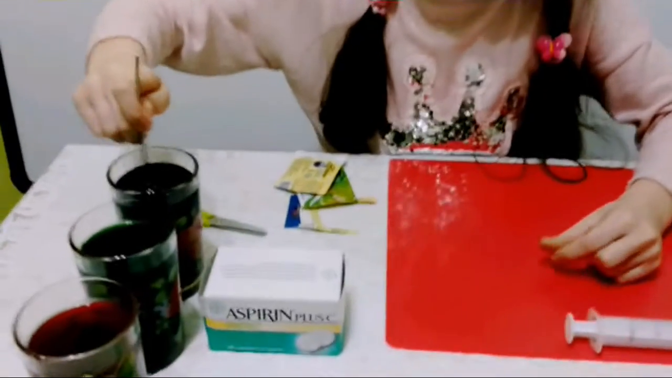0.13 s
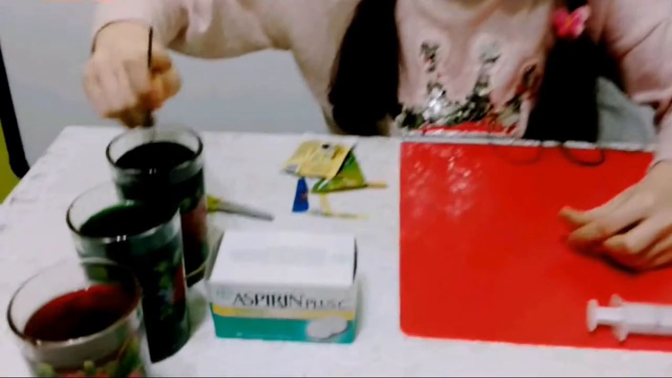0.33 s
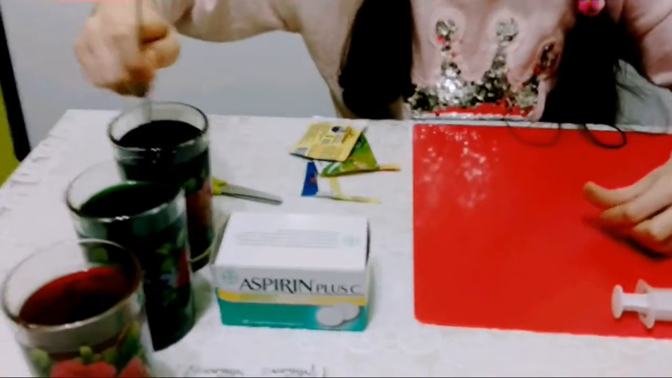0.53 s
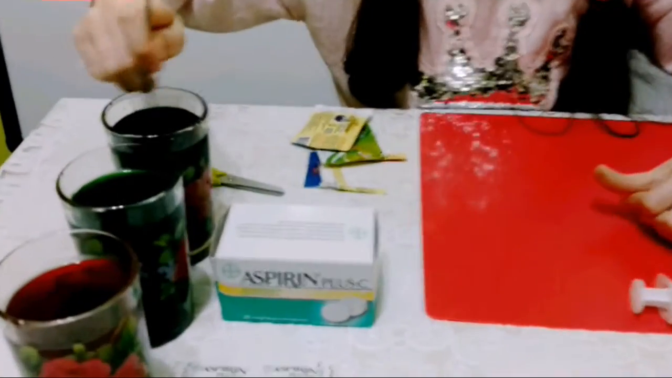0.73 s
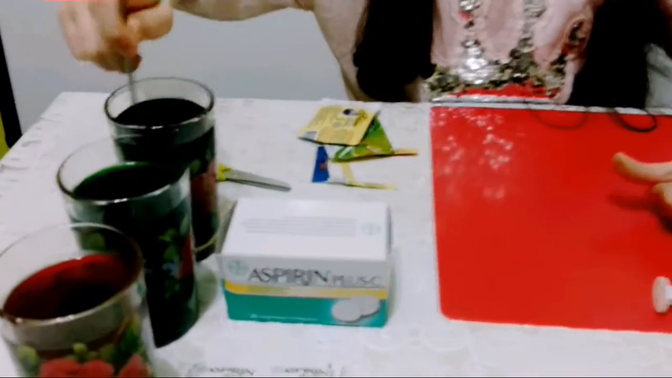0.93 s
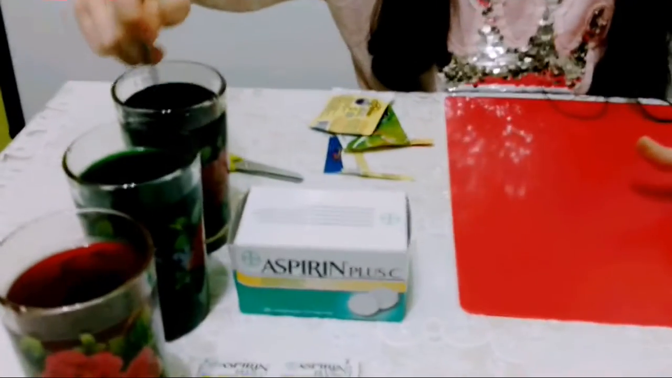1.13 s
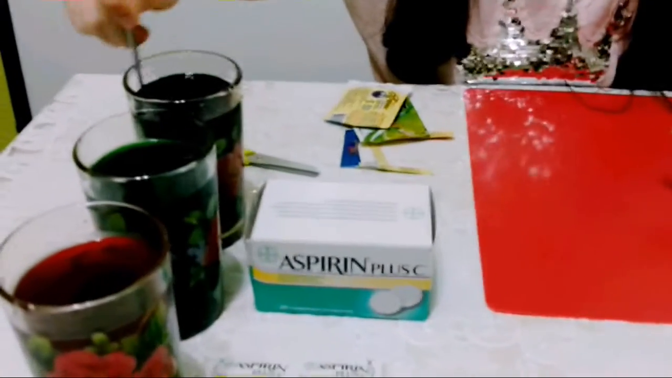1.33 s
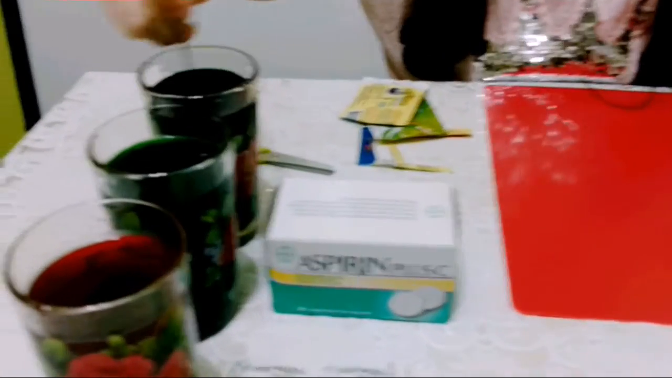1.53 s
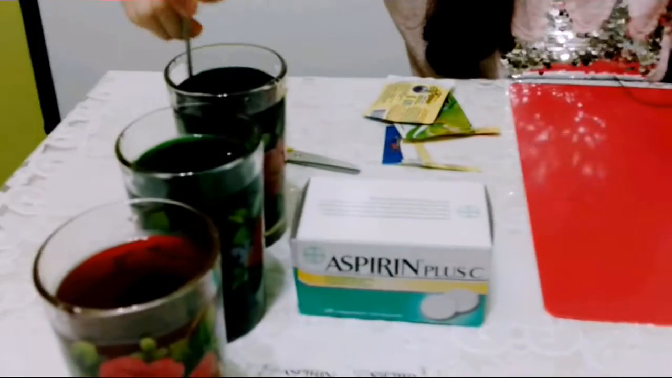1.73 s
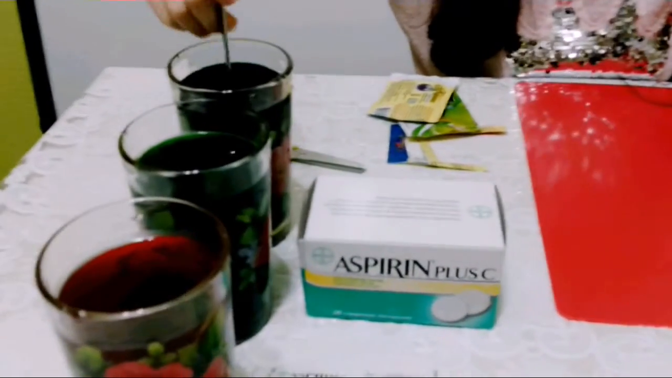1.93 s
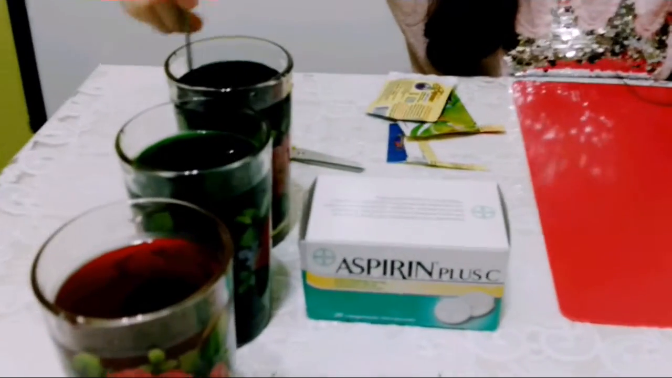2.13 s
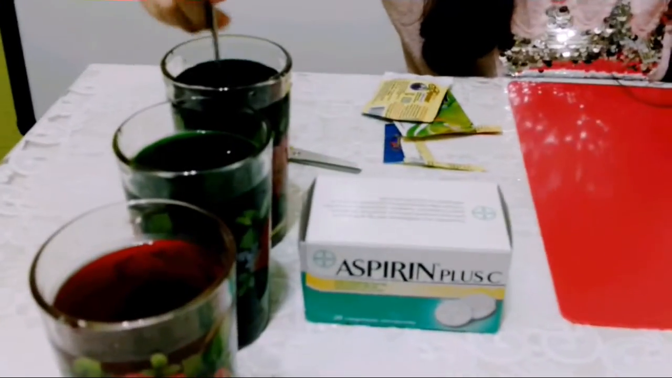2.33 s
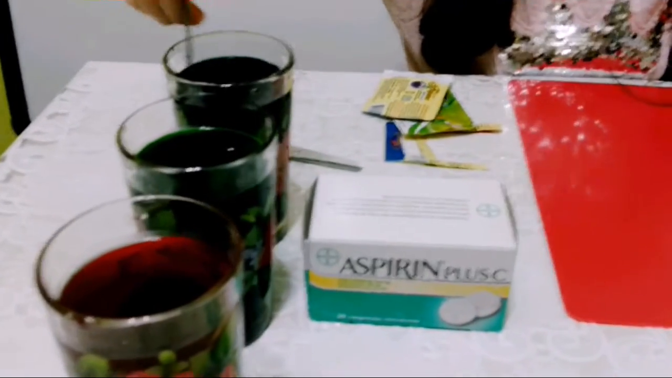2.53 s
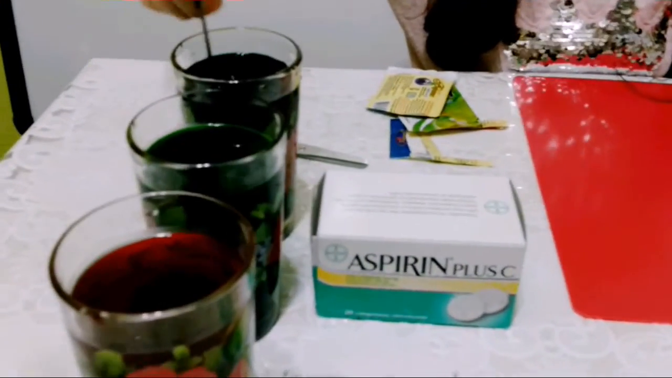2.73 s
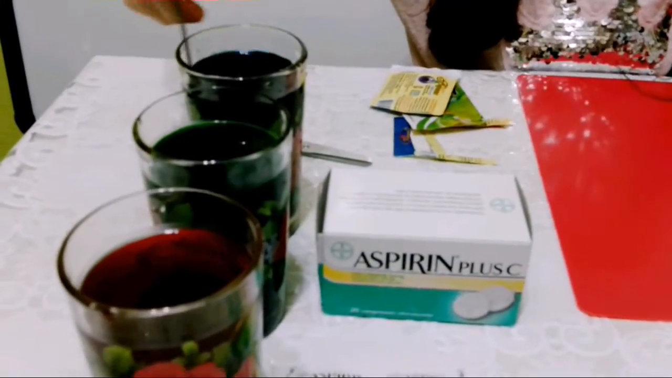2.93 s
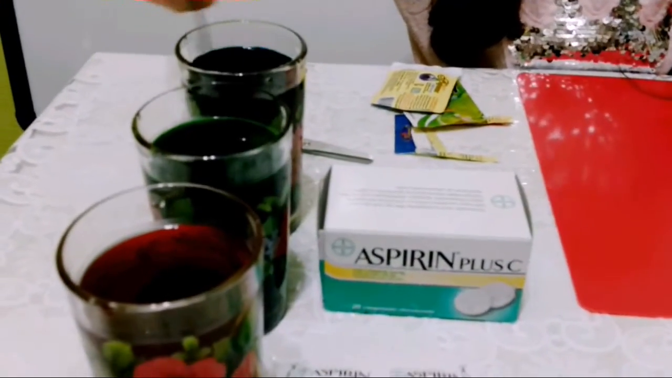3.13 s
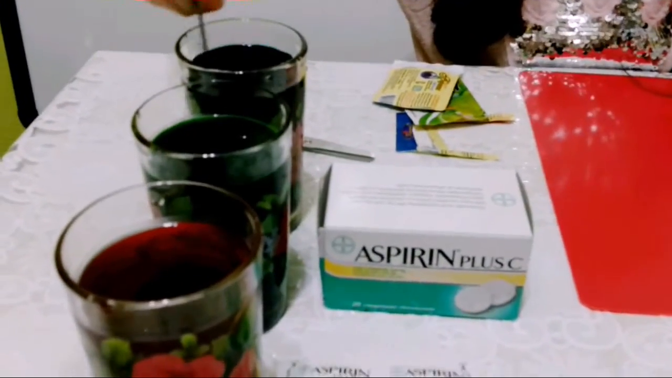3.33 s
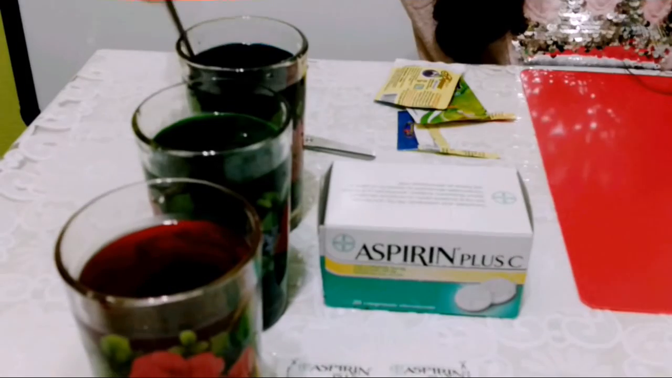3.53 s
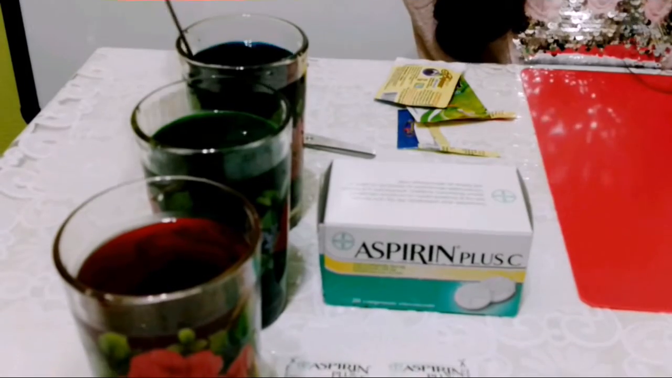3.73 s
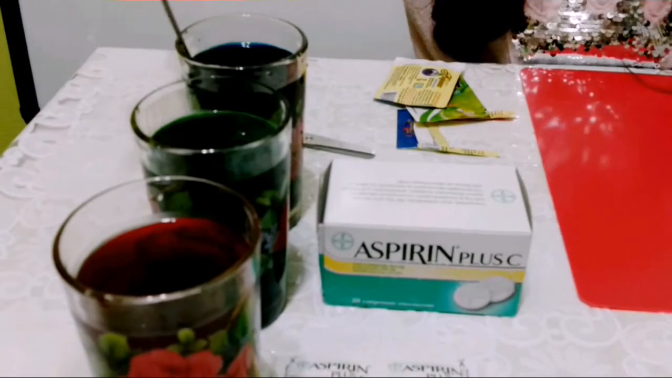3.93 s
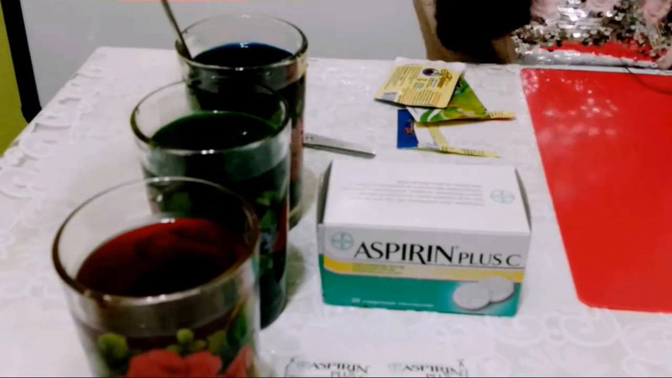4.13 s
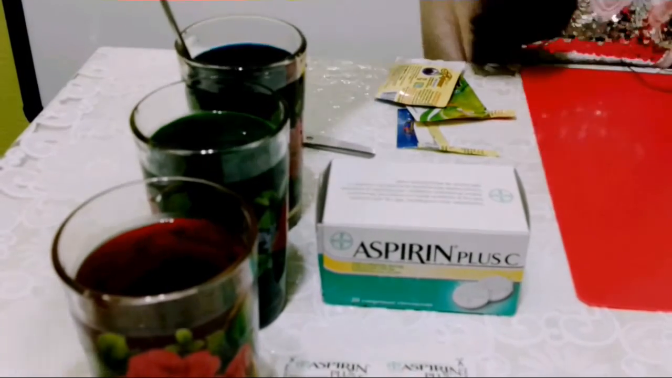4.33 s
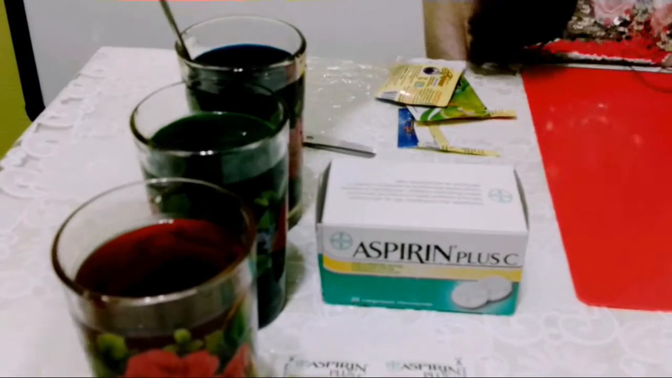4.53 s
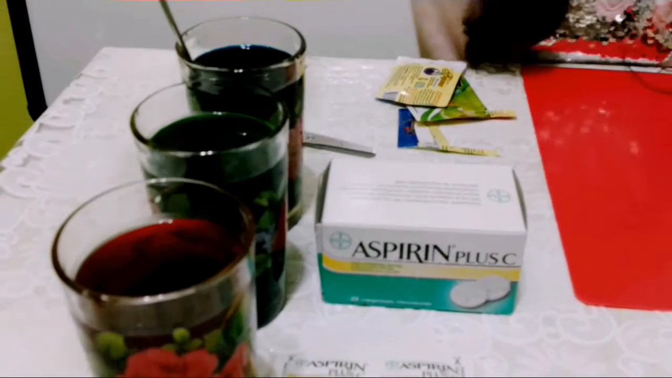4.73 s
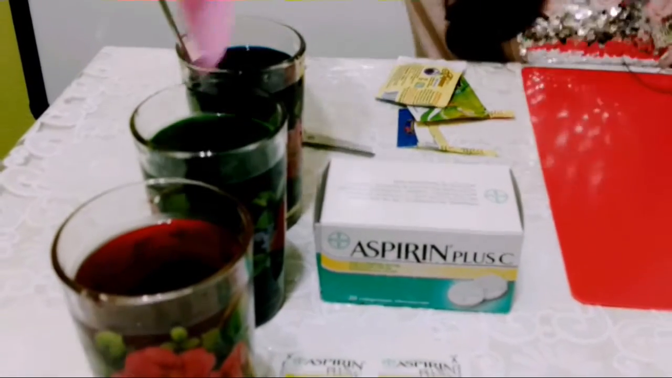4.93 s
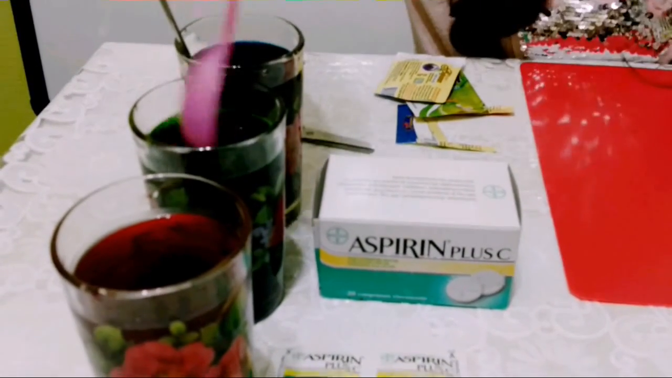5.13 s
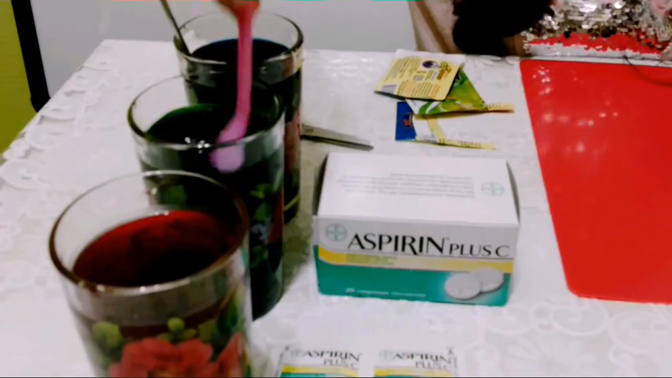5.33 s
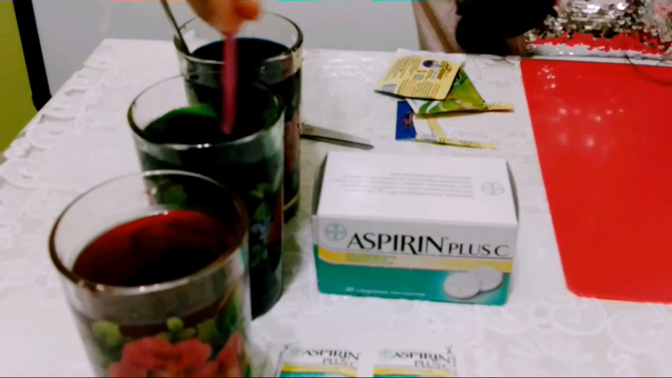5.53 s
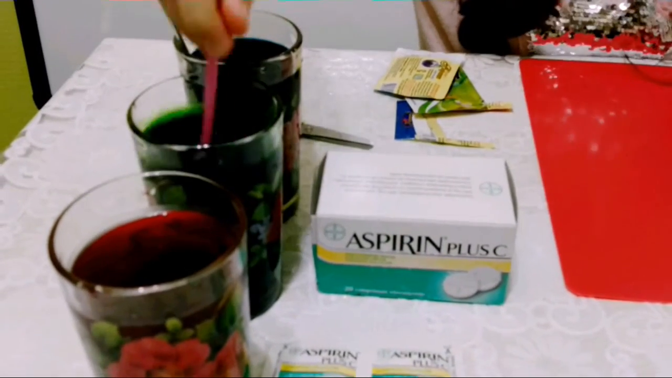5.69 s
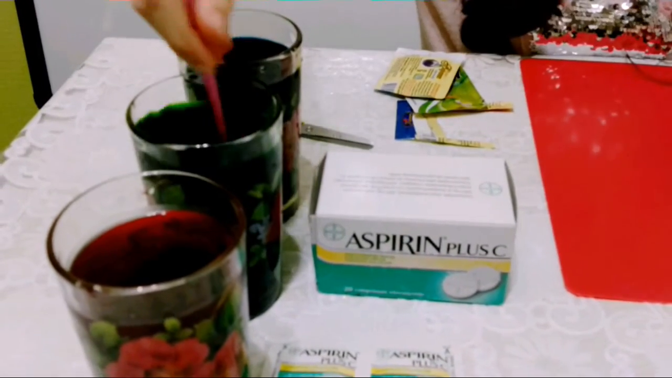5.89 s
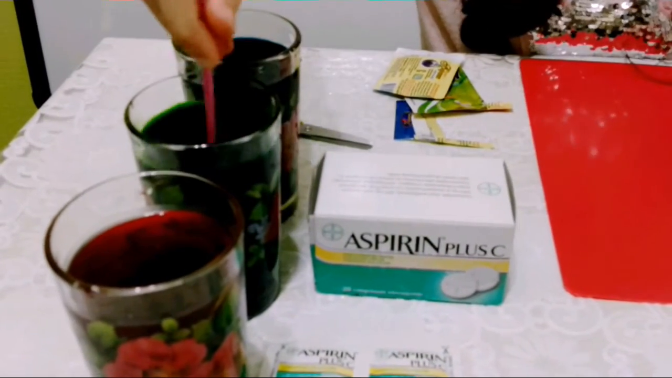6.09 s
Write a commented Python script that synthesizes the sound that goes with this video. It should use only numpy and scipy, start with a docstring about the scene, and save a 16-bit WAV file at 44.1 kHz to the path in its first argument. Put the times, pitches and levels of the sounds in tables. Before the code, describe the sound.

Bright, short glass ticks come in an irregular stirring rhythm, mixed with tiny drags and wet plops from a full glass on a cloth-covered table. They end in a hard clink, a low thump and a few settling ticks. Sleeve fabric rustles briefly in the near silence, then a few duller plastic knocks and soft scrapes follow in a second glass. Close stereo microphones, short room tail, faint hiss and electronic whine.

```python
"""Two spoons, two glasses

On a cloth-covered table in a small room a metal spoon stirs a full drinking glass: modes of glass
and spoon ring at each clink, runs of tiny slips make the drags, gliding bubbles make the slops.
After a pause with a rustle of clothing a plastic spoon knocks softly in the next glass.
Two close microphones add rumble, hiss and a thin electronic whine of two steady sines.
"""
import sys
import numpy as np
from scipy import signal
from scipy.fft import rfft, irfft, next_fast_len
from scipy.io import wavfile
from scipy.ndimage import map_coordinates

SR = 44100
rng = np.random.default_rng(int(sys.argv[2]) if len(sys.argv) > 2 else 0)


def digitize_waveform(pressure):
    """Quantize a signal to 16-bit integers and store it at the path in sys.argv[1].

    Rows of a 2-D input are taken as channels; values are limited to [-1, 1].
    """
    field = np.atleast_2d(pressure).T
    bounded = np.clip(field, -1, 1)
    quanta = np.round(bounded * 32767).astype(np.int16)
    wavfile.write(sys.argv[1], SR, quanta)


N = 276012
TIME = np.arange(N) / SR
HIT = np.arange(SR * 3 // 4) / SR  # time axis of one hit, s

# Modes of the glass on the table with the metal spoon in it.
# Each row: nominal pitch in Hz, relative level in dB, t60 in seconds.
GLASS_MODES = [(135.4, -25.5, 0.45), (303, -11.5, 0.13), (479.4, -3, 0.077), (716, -4.5, 0.08),
               (2307, 10, 0.02), (2417, 12.5, 0.0234), (2925, 9, 0.024), (3390, -17, 0.065),
               (4023, -8, 0.048), (5260, -8, 0.089), (5790, 3, 0.012), (6250, -11, 0.0768),
               (6750, -5, 0.081), (6900, -19.5, 0.13), (8230, -33, 0.076), (7900, -5, 0.087),
               (8640, -27, 0.038), (8700, -13, 0.038), (9870, 0.5, 0.05), (10500, -12, 0.047),
               (10260, 9, 0.024), (10790, -19, 0.26), (13300, -12, 0.046), (14100, -7, 0.06)]
# Colour of the metal spoon's crack. Each row: frequency in Hz, relative level in dB.
METAL_COLOUR = [(100, -40), (300, -11), (750, -15), (1100, -1.5), (1450, -6.5), (1850, -3.5), (2300, 13.5),
                (2750, 6.5), (3150, 0.5), (3500, -12.5), (3950, -21), (4700, -46.5), (5500, -18),
                (8200, -3), (10700, -13.5), (11500, -2), (14000, -22)]
# Colour of plastic rasping on glass. Each row: frequency in Hz, relative level in dB.
RASP_COLOUR = [(300, -23), (1000, 5), (1600, -10), (2300, 10), (2900, -1), (3600, -0.5), (4700, -7.5),
               (6000, -1.5), (9500, -7.5), (14000, -19)]

STIR_CHANGE_S = 4.2  # sliding and swirl are the metal spoon's before this, the plastic spoon's after
RIM_HZ = 2068  # nominal pitch of the rim
SCRAPE_SPREAD_DB = 5  # how unequal the slips of a scrape are
PLOP_GLIDE = .07  # share by which a bubble's pitch glides, before any chance factor


def undb(db):
    """Decibels to gain."""
    return 10 ** (np.asarray(db) / 20)


def unit(x):
    """Scale to rms 1."""
    return x / np.sqrt(np.mean(x ** 2))


def fade(t60):
    """Exponential decay over the length of one hit, down 60 dB after t60 seconds."""
    return np.exp(-np.log(1000) * HIT / t60)


def add(track, s, sound):
    """Mix a sound into a track at a time in seconds."""
    i = max(int(s * SR), 0)
    track[i:i + len(sound)] += sound[:max(N - i, 0)]


def colour(x, points):
    """Causal minimum-phase filter through (Hz, dB) points."""
    n = 2 * next_fast_len(len(x))
    hz, db = np.transpose(points)
    f = np.maximum(np.arange(n // 2 + 1) * SR / n, 1)
    cepstrum = irfft(np.log(undb(np.interp(np.log(f), np.log(hz), db))))
    # folding the cepstrum forward makes the response causal
    cepstrum[1:n // 2] *= 2
    cepstrum[n // 2 + 1:] = 0
    return irfft(rfft(x, n) * np.exp(rfft(cepstrum)))[:len(x)]


def unevenness(rate, count=N):
    """Smooth random wandering around zero, with rate (Hz) new targets a second."""
    knots = rng.standard_normal(int(count / SR * rate) + 2)
    return np.interp(TIME[:count] * rate, np.arange(len(knots)), knots)


def waver(x, share, rate):
    """Moving water and a moving contact point bend every pitch by a wandering share."""
    speed = 1 + share * unevenness(rate, count=len(x))
    return map_coordinates(x, [np.cumsum(speed)], mode="mirror")


def flutter(x, depth_db, rate):
    """The level of a ring trembles as water and spoon brush the wall."""
    return x * undb(depth_db * unevenness(rate, count=len(x)))


def grit(count, spread_db):
    """Tiny slips of uneven size, on about a tenth of the samples."""
    slips = rng.standard_normal(count) * (rng.random(count) < .1)
    return unit(slips * undb(spread_db * np.minimum(rng.exponential(size=count), 4)))


def crack(points, t60, chatter_s):
    """Coloured noise as the dense vibration of a contact: it chatters for a moment, then is damped."""
    decay = np.minimum(np.exp(-np.log(1000) * (HIT - chatter_s) / t60), 1)
    onset = 1 - np.exp(-HIT / 0.00027)
    return unit(colour(rng.standard_normal(len(HIT)), points)) * decay * onset


def ring(modes, scatter_db, detune):
    """Decaying modes; the touching spoon changes their shares and bends their pitch a little."""
    total = np.zeros(len(HIT))
    for hz, db, t60 in modes:
        share, bend, side = rng.uniform(-1, 1, 3)
        gain = np.sign(side) * undb(db + scatter_db * share)
        total += gain * fade(t60) * np.sin(2 * np.pi * hz * (1 + detune * bend) * HIT)
    return total


def contact(x, levels, length):
    """Set four band levels: a hard edge brings out the treble, a flat blow the wall, a low one the base."""
    # bright tick, upper wall ring, lower wall ring, knock through the base (Hz)
    bands = [(4500, 16000), (2750, 4500), (1100, 2750), (100, 1100)]
    total = np.zeros(len(x))
    for band, db in zip(bands, levels):
        part = signal.sosfilt(signal.butter(6, band, "band", fs=SR, output="sos"), x)
        total += undb(db) * part / np.std(part[:int(length * SR)])
    return total


def background():
    """Low room rumble, partly alike at both microphones, their hiss and two steady electronic tones."""
    # Colour of the quiet room. Each row: frequency in Hz, relative level in dB.
    quiet_colour = [(15, -42), (25, 7.5), (95, -12), (131, -2.5), (158, -21), (191, -8), (264, -24),
                    (301, -12.5), (588, -24), (749, -40), (833, -46), (4500, -29), (6040, -29.5),
                    (12100, -19.5), (15000, -46.5)]
    # Right microphone's noise against the left. Each row: frequency in Hz, difference in dB.
    right_hiss = [(200, 0), (2400, 3), (4500, 0.5), (8300, 3), (11000, 0.5), (14000, 11.5)]
    # Whine, a row for each of its two tones: left rms level in dB, right rms level in dB.
    whine_levels = [(-68.5, -91.5), (-106, -60)]
    shared = colour(rng.standard_normal(N), [(40, -4), (250, 3.0), (1000, -27.0), (3000, -24.0)])
    left, right = (unit(colour(own + shared, quiet_colour)) for own in rng.standard_normal((2, N)))
    noise = undb(-68) * np.array([left, colour(right, right_hiss)])
    whine = np.zeros((2, N))
    for hz, db in zip((9538.5, 11867), whine_levels):
        whine += np.sqrt(2) * np.outer(undb(db), np.sin(2 * np.pi * hz * TIME))
    return noise + whine


def sleeve():
    """Brief rustles of clothing: coloured grains that swell and die away."""
    # Each row: start in seconds, length in seconds, rms level in dB,
    # treble tilt in dB (everything below 2.5 kHz lies about twice this far under 9 kHz).
    rustles = [(4.457, 0.17, -80.5, -12), (4.689, 0.069, -57.5, 17), (4.924, 0.066, -73, -5)]
    out = np.zeros(N)
    for s, length, db, tilt_db in rustles:
        n = int(max(length, .02) * SR)
        low_db = -2 * tilt_db
        cloth = [(200, low_db), (2500, low_db), (9000, 0.012), (14000, -9.5)]  # cloth dulls the top
        rustle = colour(grit(n, spread_db=3.0), cloth)
        add(out, s, undb(db) * unit(rustle * np.hanning(n)))
    return out


def bubble(hz, cycles, glide):
    """A trapped air pocket rings, gliding in pitch by a share of it, and dies within some cycles."""
    t = HIT[:int(SR * cycles / hz)]
    age = t * hz / cycles
    tone = np.sin(2 * np.pi * hz * t * (1 + glide * age / 2))
    return tone * np.exp(-np.log(1000) * age) * (1 - np.exp(-t * hz))


def chance_plops(slosh_db):
    """Unevenly spaced further plops that follow the swirl, as rows of seconds, dB and Hz."""
    gap_s, over_slosh_db, middle_hz, spread_oct = .07, 11, 504, 0.513
    starts = np.arange(0, N / SR, gap_s)
    late, size, pitch = rng.uniform(-1.1, 1, (len(starts), 3)).T
    times = starts + gap_s * (1 + late) / 2
    peak_db = np.interp(times, TIME, slosh_db) + over_slosh_db + 4 * size
    return list(zip(times, peak_db, middle_hz * 2 ** (spread_oct * pitch)))


def water(db):
    """Short plops, each with a small wet slap, over a swirl of little bubbles and fizz."""
    # Separately heard plops, strong and faint, as water folds over the spoon.
    # Each row: start in seconds, bubble level in dB, bubble's starting pitch in Hz.
    placed_plops = [(0.377, -54, 487), (0.607, -60, 470), (.71, -52.5, 435), (0.797, -50, 331.6),
                    (.915, -50, 450), (.971, -52.5, 637), (1.18, -46, 717), (1.286, -48.5, 665),
                    (1.38, -47.5, 472), (1.452, -53, 340), (1.497, -51.5, 806), (1.505, -52, 383),
                    (1.555, -56, 635), (1.6, -53.5, 466), (1.665, -59, 730), (1.725, -49, 463),
                    (1.865, -57, 480), (1.913, -47.5, 417), (2.001, -50, 442), (2.005, -59, 790),
                    (2.038, -52, 462), (2.062, -51.5, 448), (2.109, -32.5, 717), (2.113, -51, 310),
                    (2.684, -43, 314), (3.116, -46.5, 318.4), (2.15, -54, 750), (2.247, -54.5, 471),
                    (2.287, -48.5, 467), (2.432, -55, 317), (2.434, -53, 804), (2.48, -54.5, 460),
                    (2.484, -55, 780), (2.616, -57.5, 479), (2.645, -53.5, 503), (2.665, -50.5, 700),
                    (2.735, -60, 570), (2.818, -58, 402), (2.89, -67, 494), (3.213, -51.5, 474),
                    (3.382, -49.5, 328), (3.388, -56, 450), (3.49, -60, 448), (3.655, -70, 480),
                    (3.755, -59, 445), (4.065, -70, 433), (6.06, -59, 263), (6.125, -60, 237)]
    # Colour of slap and swirl. Each row: frequency in Hz, relative level in dB.
    water_colour = [(80, -34.5), (140, -5.5), (190, -15.5), (315, 11.5), (380, -7.5), (465, 10.5),
                    (580, -4.5), (690, 4), (800, 8), (1000, -6.5), (2000, -40), (5000, -35.5)]
    slap_db, swirl_db, fizz_db, wander_db = -7, -2, -6, 4
    plops, swirl = np.zeros(N), np.zeros(N)
    for s, peak_db, hz in list(placed_plops) + chance_plops(db):
        add(plops, s, undb(peak_db + slap_db) * crack(water_colour, t60=0.078, chatter_s=0.0038))
        glide = PLOP_GLIDE * rng.uniform(-1.5, 1.5)
        add(plops, s, undb(peak_db) * bubble(hz, cycles=48, glide=glide))
    for when, pitch, size in rng.random((850, 3)):
        little = bubble(290 * 2 ** (1.5 * pitch), cycles=32, glide=PLOP_GLIDE)
        add(swirl, when * N / SR, undb(18 * size) * little)
    swirl = colour(unit(swirl) + undb(fizz_db) * grit(N, spread_db=-5.5), water_colour)
    swirl = unit(swirl * undb(wander_db * unevenness(rate=9.2)))
    return plops + swirl * undb(db + swirl_db)


def swells(rows, spectrum):
    """Short runs of rubbing that rise and fall."""
    out = np.zeros(N)
    for s, length, db in rows:
        n = int(max(length, .02) * SR)
        run = colour(grit(len(HIT), spread_db=3.5), spectrum)[-n:]
        add(out, s, undb(db) * unit(run * np.hanning(n)))
    return out


def rubbed(slips, spectrum, ring_db, rim_db):
    """Slips of the spoon, heard through the spoon, the glass wall and the rim, which the touch damps."""
    wall = signal.fftconvolve(slips, ring(GLASS_MODES, scatter_db=6, detune=0.025))[:len(slips)]
    held_rim = fade(.05) * np.sin(2 * np.pi * RIM_HZ * HIT)
    singing = signal.fftconvolve(slips, held_rim)[:len(slips)]
    return unit(colour(slips, spectrum)) + undb(ring_db) * unit(wall) + undb(rim_db) * unit(singing)


def sliding(db):
    """The tip slides over the bottom under uneven pressure: metal keeps the glass singing, plastic rasps."""
    # Colour of the metal tip on the bottom. Each row: frequency in Hz, relative level in dB.
    slide_colour = [(300, -8), (750, -18), (1250, -16.5), (1850, -7), (2100, 1.5), (2380, 16), (2750, -21),
                    (4500, -31), (5400, -9), (6800, -3), (10000, 2), (14000, -34.5)]
    pressure_db = 6 * unevenness(rate=28) + 5 * unevenness(rate=9)  # quick and slow wandering
    slips = grit(N, SCRAPE_SPREAD_DB) * undb(pressure_db)
    metal = unit(rubbed(slips, slide_colour, ring_db=-18.0, rim_db=-13))
    metal = waver(metal, share=.015, rate=22)
    plastic = unit(colour(slips, RASP_COLOUR))
    return undb(db) * np.where(TIME < STIR_CHANGE_S, undb(6) * metal, undb(12) * plastic)


def plastic_spoon():
    """Soft knocks that rasp on; the place of contact favours some modes, the slosh bends and shakes them."""
    # Each row: start in seconds, tick in dB, lower wall ring in dB, knock through the base in dB,
    # pitch that this place of contact favours in Hz, relative level of the glass ring in dB.
    taps = [(5.445, -57, -51, -56, 1200, 0), (5.5629, -50.5, -36, -52.5, 1420, -11.5),
            (5.7817, -53, -42.5, -51, 1200, -2), (5.9827, -51, -42.5, -57.5, 1800, -13),
            (6.0141, -52.5, -56, -64, 1800, -9), (6.0494, -51, -65, -67, 1840, -10),
            (6.108, -58.5, -66.5, -67.5, 2270, -6), (6.144, -59.5, -68, -77, 2210, -6),
            (6.189, -63.5, -66.5, -65.5, 2130, -4.5)]
    # Modes of the second glass with the plastic spoon in it.
    # Each row: nominal pitch in Hz, relative level in dB, t60 in seconds.
    second_modes = [(137, -12.5, 0.49), (244, -4.5, 0.23), (307, -5, 0.28), (560, -6, 0.076),
                    (1183, -9, 0.19), (1227, -8, 0.22), (1432, -7, 0.17), (1443, -13.5, 0.29),
                    (1700, -20, 0.42), (1758, -13, 0.3), (1818, -8.5, 0.26), (2550, 4, 0.053),
                    (2380, -3, 0.056), (3550, -19, 0.037)]
    # Colour of the plastic crack. Each row: frequency in Hz, relative level in dB.
    plastic_colour = [(100, -44), (300, 3), (700, -0.5), (1050, 8.5), (1220, -21), (1550, 4), (2050, -9.5),
                      (2430, 13), (2700, 3), (3200, -11), (3650, -12.5), (5000, -11.5), (9500, 5),
                      (14500, -27)]
    favour_db, favour_oct = 11, .13
    upper_wall_db, free_ring_db, rasp_db = -9.5, -6, -11  # upper wall against lower; the others trim
    out = np.zeros(N)
    for s, tick_db, wall_db, knock_db, favoured_hz, ring_db in taps:
        modes = []
        for hz, db, t60 in second_modes:
            octaves = np.log2(hz / favoured_hz)
            modes.append((hz, db + favour_db * np.exp(-(octaves / favour_oct) ** 2), t60))
        tones = waver(ring(modes, scatter_db=1.5, detune=0.003), share=.008, rate=70)
        tones = flutter(tones, depth_db=2.5, rate=90)
        blow = crack(plastic_colour, t60=0.0095, chatter_s=0.004)
        rasp = undb(rasp_db) * crack(plastic_colour, t60=0.079, chatter_s=0.0024)
        levels = (tick_db, wall_db + upper_wall_db, wall_db, knock_db)
        add(out, s, contact(blow + undb(ring_db + free_ring_db) * tones + rasp, levels, length=0.013))
    return out


def rim():
    """The rim's bending modes: swirling water splits them into beating pairs, bends and shakes them."""
    waver_share = .005
    hz = RIM_HZ * (1 + waver_share * rng.standard_normal())
    twin_hz = hz - 18 * rng.uniform(0.55, 1.76)
    tones = np.zeros(len(HIT))
    for f, db in [(hz, 0), (twin_hz, -5), (2335, -13)]:
        tone = waver(undb(db) * np.sin(2 * np.pi * f * HIT), waver_share, rate=60)
        tones += flutter(tone, depth_db=3, rate=40)
    return undb(1) * fade(.36) * tones


def spoon_modes(count=15):
    """The spoon's own resonances shift with grip and depth, so every blow has another set."""
    hz = np.geomspace(2800, 11000, count) * (1 + rng.uniform(-.06, .06, count))
    db = np.maximum(np.interp(hz, *np.transpose(METAL_COLOUR)), -18)
    return ring([(f, d, .095) for f, d in zip(hz, db)], scatter_db=6, detune=0)


def strike_point(x, spread_db, count=14):
    """Every place of contact favours other parts of the spectrum."""
    hz = np.geomspace(1200, 15000, count)
    return colour(x, np.column_stack([hz, spread_db * rng.uniform(-0.63, 1, count)]))


def drag(levels, length):
    """A short run of slips that swells and dies away, over 10 ms at least."""
    length = max(length, .01)
    slips = grit(len(HIT), SCRAPE_SPREAD_DB / 2) * np.sin(np.pi * np.minimum(HIT / length, 1))
    scrape = rubbed(slips, METAL_COLOUR, ring_db=-3.0, rim_db=-7.0)
    return contact(strike_point(scrape, spread_db=13.0), levels, length)


def thump(hz, t60):
    """A low note of the glass on the table, blurred by the shorter dull thud of the table top."""
    note = (1 - np.exp(-HIT * hz)) * np.sin(2 * np.pi * hz * HIT)
    dull = [(hz / 2, -22), (hz * 1.1, 0), (hz * 2, -20)]
    thud = unit(colour(rng.standard_normal(len(HIT)), dull))
    return fade(t60) * note + undb(-5) * fade(t60 * .6) * thud


def clink_blow(rim_db, body_colour):
    """One blow: crack, tick and a rebound, with the modes of glass, rim, spoon and wall ringing on."""
    tick_colour = [(3000, -41), (6000, -3.5), (8500, 19.5), (11000, 10.0), (14000, -17.5)]
    tick = crack(tick_colour, t60=0.00453, chatter_s=0.0024)
    bounce = crack(METAL_COLOUR, t60=0.009, chatter_s=0.0017)
    rebound = np.roll(bounce, int(rng.uniform(0.0034, .013) * SR))
    blow = crack(METAL_COLOUR, t60=0.0097, chatter_s=0.0054)
    blow = blow + undb(3) * tick + undb(-7) * rebound
    blow = blow + undb(-12) * ring(GLASS_MODES, scatter_db=6.0, detune=0.0325)
    blow = blow + undb(rim_db) * rim() + undb(-10.5) * spoon_modes()
    blow = blow + undb(-11) * crack(body_colour, t60=.12, chatter_s=0.002)
    return strike_point(blow, spread_db=3)


def metal_spoon():
    """Blows ring the glass, bounce once and skid on; drags are short runs of slips into the same glass."""
    # Blows; the rim sings on when the spoon springs free and is damped when it stays in touch.
    # Each row: start in seconds, bright tick in dB, upper wall ring in dB, lower wall ring in dB,
    # knock through the base in dB, skid in dB below the blow, relative level of the rim in dB.
    clinks = [(0.2495, -38.5, -55, -46, -57.5, 5.5, -6), (0.5012, -59, -51.5, -39, -41.5, 33, -24),
              (0.675, -48.5, -66, -48.5, -54, 22, -10), (0.8447, -80, -72, -47.5, -49.5, 13, 0),
              (1.005, -49, -60, -55, -84, 15, -16), (1.0607, -42.5, -52, -43.5, -48.5, 16, -22),
              (1.1735, -43, -68, -49.5, -55, 7.5, -16), (1.3422, -35, -43.5, -39.5, -45, 3.5, -28),
              (1.767, -33.5, -47, -46, -60.5, 17, -5), (1.8345, -46.5, -66, -54, -50.5, 9, -25),
              (1.929, -48.5, -78.5, -49.5, -62, 33, -12), (2.1076, -46.5, -45, -33, -45.5, 24, -28),
              (2.1584, -42, -56, -51.5, -70, 12.5, -8.5), (2.2826, -34, -50, -44, -50.5, 19, -9.5),
              (2.521, -36.5, -48, -43, -57, 9, -3.5), (2.6436, -49, -64, -56, -62.5, 24, -22),
              (2.6801, -43.5, -60, -43, -50.5, 11, -17.5), (2.864, -35.5, -51, -46, -55, 7, -3),
              (2.9687, -35.5, -46, -47, -49, 18, -29), (2.982, -56, -56, -69, -51.5, 27, -20),
              (3.0025, -34, -56.5, -46, -52.5, 35, -17), (3.1117, -39.5, -50, -43.5, -49.5, 21, -19.5),
              (3.2634, -41, -55, -50, -58.5, 11, -31), (3.3466, -27.5, -64.5, -40.5, -56, 43, -9.5),
              (3.551, -42.5, -65, -46.5, -63, 16, -4.5), (3.578, -22.5, -43.5, -33.5, -42.5, 31, -17),
              (3.7507, -37, -55, -52, -66, 45, -11.5), (3.9791, -37.5, -58.0, -44, -53.5, 21, -15),
              (3.996, -41.5, -61.5, -47.5, -60.5, 27, -12), (4.0643, -41, -57, -50, -60, 11, -19),
              (4.076, -48, -59, -49, -53.5, 15.5, -7), (4.1471, -47, -63, -53, -69, 10, -15),
              (4.2019, -49, -52, -49, -73, 25, -24), (4.213, -62, -62.5, -57, -67, 26, -19),
              (4.261, -59, -75, -60, -78, 22, -14), (4.2938, -54, -75.0, -70, -85, 17, -26)]
    # Drags along the wall, alone or just ahead of a blow. Each row: start in seconds,
    # relative bright tick in dB, relative lower wall ring in dB, length in seconds (10 ms at least).
    drags = [(0.057, -70, -62, 0.066), (0.121, -75, -58, 0.033), (0.146, -49.5, -88, 0.065),
             (0.287, -51.5, -90, 0.049), (0.472, -57, -61, 0.021), (0.702, -52.5, -70, 0.019),
             (0.789, -79, -51, 0.007), (0.824, -45, -50.5, 0.022), (0.95, -58, -62.5, 0.052),
             (1.049, -51, -78, .016), (1.222, -58, -60, 0.026), (1.597, -89, -65, 0.035),
             (1.648, -95, -62.5, 0.013), (1.758, -54, -62.5, 0.013), (1.895, -64, -55.5, 0.019),
             (2.146, -43, -58.5, 0.023), (2.257, -57, -59, 0.023), (2.488, -57, -65, 0.053),
             (2.655, -57, -65, 0.025), (2.852, -53, -61, 0.0079), (3.098, -79, -67, 0.015),
             (3.949, -48.5, -62.5, 0.05), (4.154, -58.5, -58, 0.015)]
    # The spoon drops to the bottom and the glass thumps the table.
    # Each row: start in seconds, pitch in Hz, level of the note in dB, t60 of the note in seconds.
    thumps = [(3.349, 479, -33.5, 0.046), (3.35, 182, -51, 0.16), (3.581, 305.4, -40.5, 0.34),
              (3.582, 254, -52, 0.36), (3.578, 133.5, -52.5, 0.79), (3.983, 324, -49.5, 0.084),
              (4.066, 206, -70, .16), (4.147, 311, -49.5, 0.084), (4.206, 252, -49.5, 0.086),
              (4.286, 302, -58, 0.15)]
    # Crowded resonances of spoon and wall after a blow. Each row: frequency in Hz, relative level in dB.
    body_colour = [(150, -33), (250, -11), (315, 5.5), (390, -4.5), (470, 7.5), (580, -13), (750, 3),
                   (850, 2.5), (1000, -32), (1400, -25), (1900, -0.5), (2080, 4), (2200, 4.5), (2330, 6.5),
                   (2550, -9), (2750, -14), (2970, -7.5), (3300, -19), (3600, -6), (3900, -4),
                   (4600, -35.5), (5500, -4.5), (6800, -4), (9000, -8.5), (14000, -23.5)]
    skid_s = 0.026
    drag_db, upper_wall_db, knock_db = -1, -10, -6  # all of a drag; its shares against the lower wall
    out = np.zeros(N)
    for s, *levels, skid_db, rim_db in clinks:
        add(out, s, contact(clink_blow(rim_db, body_colour), levels, length=0.0084))
        add(out, s, undb(-skid_db) * drag(levels, skid_s))
    for s, bright_db, wall_db, length in drags:
        levels = (bright_db, wall_db + upper_wall_db, wall_db, wall_db + knock_db)
        add(out, s, undb(drag_db) * drag(levels, length))
    for s, hz, db, t60 in thumps:
        add(out, s, undb(db) * thump(hz, t60))
    return out


def room(x):
    """Direct sound, later and shaded at the right microphone, and a short tail with bass alike on both."""
    # Direct sound at the right microphone. Each row: frequency in Hz, gain in dB.
    right_shade = [(200, -0.5), (1200, -7), (2400, 5), (5500, -12.5), (8500, -42.5), (11000, -4),
                   (14000, -11)]
    # Room tail at the right microphone. Each row: frequency in Hz, gain in dB.
    right_room = [(200, 1), (1200, 0), (2400, 0), (5500, 4), (8500, -4), (11000, -8.5), (14000, 2)]
    onset_s, common_hz, right_lag_s = 0.00099, 500, .00014
    bass = signal.butter(2, common_hz, fs=SR, output="sos")
    treble = signal.butter(2, common_hz, "high", fs=SR, output="sos")
    common = signal.sosfilt(bass, rng.standard_normal(len(HIT))) * fade(0.18) * undb(-5.0)
    tails = []
    for own in rng.standard_normal((2, len(HIT))):
        tail = common + signal.sosfilt(treble, own) * fade(0.16)
        tail = tail * (1 - np.exp(-HIT / onset_s))
        tails.append(undb(-5) * signal.fftconvolve(x, tail / np.linalg.norm(tail))[:N])
    late = np.roll(colour(x, right_shade), int(right_lag_s * SR))
    return np.array([x + tails[0], late + colour(tails[1], right_room)])


def scene():
    """Both spoons and the water, heard in the room."""
    # Stirring with each spoon.
    # Each row: time in seconds, relative slosh in dB, relative sliding of the tip on the bottom in dB.
    metal_stir = [(0.0, -60.5, -49.5), (.12, -69.5, -64), (.2, -125, -69.5), (0.31, -75, -66),
                  (0.56, -61.5, -59), (0.75, -69, -69), (1.57, -67, -65), (2.12, -71.5, -80),
                  (2.37, -69, -76), (3.02, -79, -69.5), (3.6, -80, -72), (3.77, -80, -88), (4.01, -91, -97),
                  (4.15, -82, -76), (4.3, -72, -75), (4.7, -74, -105)]
    plastic_stir = [(5.201, -72.5, -114), (5.534, -63, -74.5), (5.773, -71.5, -87.5), (6.259, -70, -77)]
    # The plastic spoon rasps along the wall around its knocks.
    # Each row: start in seconds, length in seconds, rms level in dB.
    rasps = [(5.53, 0.042, -64), (5.59, .07, -84), (5.745, 0.045, -63), (5.81, 0.074, -67),
             (5.99, .08, -60), (6.09, .16, -68.5)]
    # The released metal spoon settles and the glass rumbles on the table.
    # Each row: start in seconds, length in seconds, rms level in dB.
    rumbles = [(3.73, 0.082, -67), (3.97, 0.21, -67.5), (4.13, 0.28, -71)]
    # Colour of that rumble. Each row: frequency in Hz, relative level in dB.
    rumble_colour = [(90, -27), (170, -7), (210, 4), (260, -2.5), (330, 1), (420, -16), (700, -38)]
    s, *columns = np.vstack([metal_stir, plastic_stir]).T
    slosh_db, slide_db = (np.interp(TIME, s, c) for c in columns)
    slosh_db = slosh_db + np.where(TIME < STIR_CHANGE_S, -2, -11)  # trims: metal, plastic
    rubbing = sliding(slide_db) + swells(rasps, RASP_COLOUR) + swells(rumbles, rumble_colour)
    spoons = plastic_spoon() + metal_spoon()
    return background() + room(sleeve() + water(slosh_db) + rubbing + spoons)


def record(dry):
    """The recorder cuts the top, steeply above 14.4 kHz."""
    return signal.sosfilt(signal.ellip(8, .2, 70, 14400, fs=SR, output="sos"), dry)


dry = scene()
out = record(dry)
digitize_waveform(out)
```